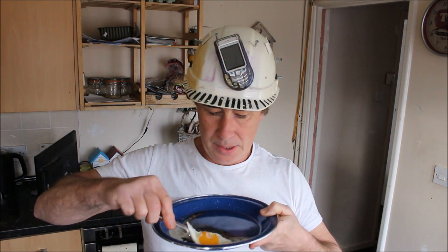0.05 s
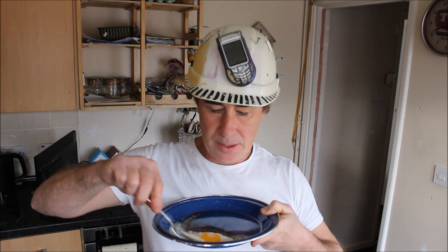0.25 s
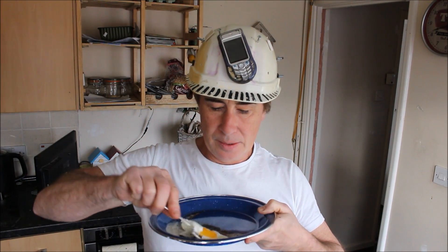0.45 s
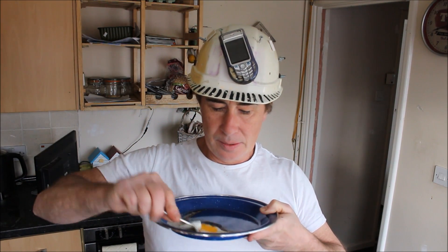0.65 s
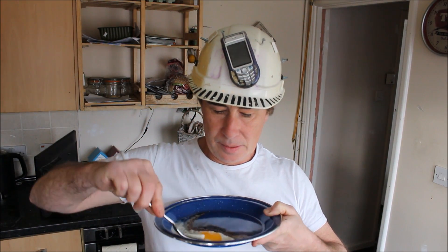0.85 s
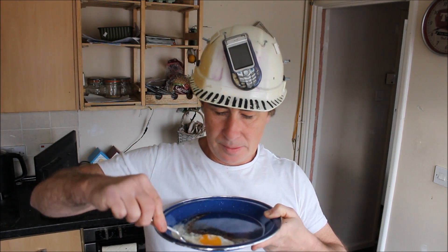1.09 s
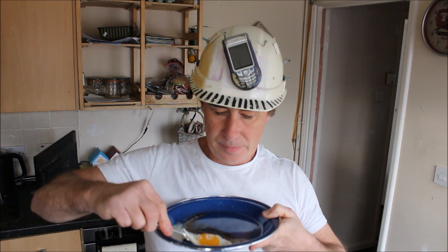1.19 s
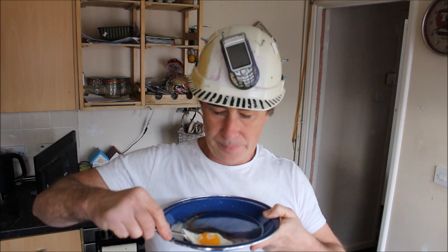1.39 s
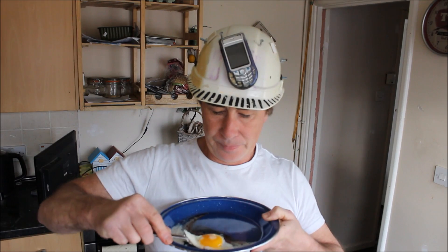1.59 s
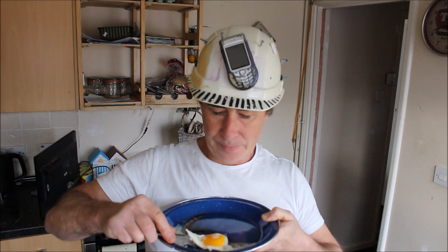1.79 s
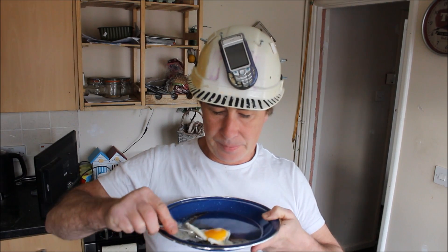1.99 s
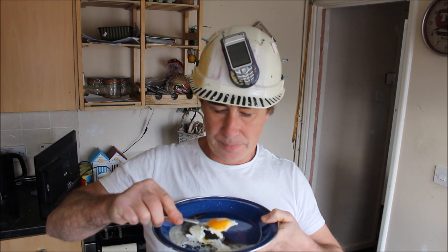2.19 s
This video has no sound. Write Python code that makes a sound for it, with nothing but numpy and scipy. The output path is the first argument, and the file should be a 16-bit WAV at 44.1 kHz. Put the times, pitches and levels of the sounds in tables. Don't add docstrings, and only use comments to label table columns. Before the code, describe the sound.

A steel fork strikes a plate with a loud bright clink, scrapes and slides briefly, taps once more, then cuts softly through egg; small hard kitchen, microphone about two metres away, faint low hum behind.

```python
import sys
import numpy as np
from scipy import signal
from scipy.fft import rfft, irfft
from scipy.io import wavfile
from scipy.ndimage import uniform_filter1d

SR = 44100
rng = np.random.default_rng(int(sys.argv[2]) if len(sys.argv) > 2 else 0)


def dump_mix(stems):
    frames = np.atleast_2d(stems).T
    limited = np.clip(frames, -1, 1)
    pcm = np.round(limited * 32767).astype(np.int16)
    wavfile.write(sys.argv[1], SR, pcm)


def volts(x):
    e = np.asarray(x, float) / 20
    return 10 ** e


N = 99225

# (frequency [Hz], width [Hz], level [dB])
MIDDLE_MODES = [(785, 26.6, -37.5), (990, 24, -15.5), (1520, 81, -3), (1780, 97, 9.5), (2315, 130, -6),
                (2575, 160, 9), (3230, 140, 5.5), (3620, 150, 4.5), (4380, 160, -2), (4540, 92, -5)]


def evened(x):
    return x / np.sqrt(np.mean(x ** 2) + 1e-20)


def read(points, hz):
    f, value = np.transpose(points)
    return np.interp(np.log(hz + 1), np.log(f + 1), value)


def resonate(x, hz, width):
    turn = np.exp(2j * np.pi * np.cumsum(hz * np.ones(len(x))) / SR)
    r = np.exp(-np.pi * width / SR)
    return 2 * (turn * signal.lfilter([1 - r], [1, -r], x / turn)).real


def tone(hz, level):
    return np.sqrt(2) * level * np.sin(2 * np.pi * np.cumsum(hz) / SR)


def causal(points, tilt_db=0):
    hz = abs(np.fft.fftfreq(1024, 1 / SR))
    flat = volts(read(points, hz))
    log = np.log(flat * volts(tilt_db * np.log2((hz + 100) / 2500)))
    impulse = np.fft.ifft(np.exp(np.conj(signal.hilbert(log)))).real[:512]
    return impulse / np.sqrt(np.mean(flat ** 2))


def air():
    # (frequency [Hz], level [dB])
    noise_spectrum = [(25, 0), (100, -3), (200, -4), (430, -7), (1330, -10.5), (5730, -17.5), (13600, -26),
                      (16000, -35)]
    # (frequency [Hz], correlation [0-1])
    coherence = [(60, 0.27), (400, 0.067), (2400, 0.11), (15000, 0.0091)]
    level_db, patchy_db = -55.5, 1.2
    frames, hz = N // 256 + 5, np.fft.rfftfreq(1024, 1 / SR)
    a, b, c, d, patches = rng.standard_normal((frames, 513, 5)).T
    patches = evened(uniform_filter1d(uniform_filter1d(patches, 12, 0), 10, 1))
    same = read(coherence, hz)[:, None]
    left = a + 1j * b
    right = same * left + np.sqrt(1 - same ** 2) * (c + 1j * d)
    z = np.array([left, right]) * volts(read(noise_spectrum, hz)[:, None] + patchy_db * patches)
    return volts(level_db) * evened(signal.istft(z, nperseg=1024, noverlap=768)[1][:, :N])


def traffic():
    # (time [s], frequency [Hz], level [dB])
    rumble = [
        (0, 62.6, -64),
        (0.6, 65, -58.5),
        (1.2, 64, -63),
        (1.6, 60.24, -67.5),
        (2.25, 55, -69),
    ]
    width_hz = 6
    t, (s, hz, db) = np.arange(N) / SR, np.transpose(rumble)
    f = np.interp(t, s, hz)
    noise = resonate(resonate(rng.standard_normal(N), f, width_hz), f, 3 * width_hz)
    return volts(np.interp(t, s, db)) * evened(noise)


def passing():
    # (time [s], frequency [Hz], level [dB])
    engine = [
        (1.55, 68.4, -75),
        (1.68, 60.6, -59),
        (1.82, 54.7, -55),
        (1.96, 49.2, -52),
        (2.1, 44.5, -48.5),
        (2.18, 43, -53.5),
        (2.25, 41.8, -65.5),
    ]
    t, (s, hz, db) = np.arange(N) / SR, np.transpose(engine)
    return tone(np.interp(t, s, hz), volts(np.interp(t, s, db, -120)))


def fridge():
    # (time [s], frequency [Hz], level [dB])
    hum_path = [(0, 124, -54), (0.2, 135.5, -48.5), (0.27, 132.7, -60.5), (0.4, 136.4, -44.5),
                (0.49, 134, -41.5), (0.65, 132.5, -51.5), (0.86, 132.9, -45.5), (1.02, 130, -59.5),
                (1.13, 133.8, -49), (1.3, 130.7, -64.5), (1.501, 131.8, -50.5), (1.7, 130.6, -56),
                (1.9, 129.9, -52.5), (2.101, 129, -59), (2.25, 128, -55)]
    t, (s, hz, db) = np.arange(N) / SR, np.transpose(hum_path)
    return tone(np.interp(t, s, hz), volts(np.interp(t, s, db)))


def motor():
    # (time [s], level [dB])
    ticks = [
        (1.853, -52),
        (1.933, -51),
        (2.016, -51),
        (2.101, -53),
        (2.226, -51.5),
    ]
    out = np.zeros(N)
    for s, db in ticks:
        u = np.maximum(np.arange(N) / SR - s, 0)
        out += volts(db) * u / 0.003 * np.exp(1 - u / 0.0024) * np.sin(2 * np.pi * 710.6 * u)
    return out


def rub():
    # (time [s], level [dB])
    rubbing = [(0, -57), (0.15, -58), (0.19, -45), (0.36, -40.5), (0.501, -49.5), (0.62, -60.5),
               (0.67, -49.5), (0.86, -51.5), (0.98, -45.5), (1.1, -63), (1.3, -69.5), (1.38, -63.5),
               (1.55, -58.5), (1.8, -70.5), (2.1, -73), (2.15, -58), (2.25, -77.5)]
    # (frequency [Hz], width [Hz], level [dB])
    low_modes = [(361.6, 22.6, 2.1), (415.6, 22.3, 0.88)]
    # (start [s], length [s], frequency [Hz], width [Hz], level [dB])
    squeak = (0.07, 0.09, 5525, 12, -59)
    t, (s, db) = np.arange(N) / SR, np.transpose(rubbing)
    low = evened(sum(volts(d) * resonate(rng.standard_normal(N), hz, w) for hz, w, d in low_modes))
    start, length, hz, w, squeak_db = squeak
    arch = np.sin(np.pi * np.clip((t - start) / length, 0, 1)) ** .5
    thin = evened(resonate(rng.standard_normal(N), hz, w))
    return low * volts(np.interp(t, s, db)) + volts(squeak_db) * arch * thin


def ring(modes, tilt_db, crack_db):
    # (frequency [Hz], level [dB])
    crack_spectrum = [(200, -23), (750, -15.5), (1400, 1.5), (2800, 11), (4500, 3), (7000, -8),
                      (11000, -18), (16000, -28)]
    t, body = np.arange(6000) / SR, 0
    for hz, w, db in modes:
        gain = volts(db + tilt_db * np.log2(hz / 2500))
        body = body + gain * w * np.exp(-np.pi * w * t) * np.sin(2 * np.pi * hz * t)
    body /= np.sqrt(sum(volts(2 * db) * w for hz, w, db in modes) * SR / (4 * np.pi))
    body[:512] += volts(crack_db) * causal(crack_spectrum, tilt_db)
    return body


def chatter(z, ms):
    t = np.arange(len(z)) / SR * 1000
    shape = np.minimum(t / 0.288, 1) * np.exp(-t / ms)
    for _ in range(8):
        envelope = np.sqrt(abs(uniform_filter1d(z ** 2, 40)) + 1e-12)
        spectrum = rfft(z / envelope * shape)
        z = irfft(spectrum / abs(spectrum))
    return z * shape ** .5


def burst(z, ms, response, order, top_hz):
    sound = np.convolve(chatter(z, ms), response)
    sound = signal.lfilter(*signal.butter(order, top_hz, fs=SR), sound)
    return sound / abs(sound).max()


def hits(table, modes, crack_db=-0.5):
    out = np.zeros(N + 9000)
    for (s, db, tilt_db, ms, top_hz), z in zip(table, rng.standard_normal((len(table), 1500))):
        sound = burst(z, ms, ring(modes, tilt_db, crack_db), 4, top_hz)
        out[round(s * SR):][:len(sound)] += volts(db) * sound
    return out[:N]


def stroke(curve, modes):
    grains_per_s, spread_db, grit_db = 2500, 2, -0.5
    s, db, tilt_db = np.transpose(curve)
    t = np.arange(N) / SR
    sizes = volts(spread_db * np.minimum(rng.exponential(1, N), 2.6))
    slips = sizes * (rng.random(N) < grains_per_s / SR) * rng.choice([-1, 1], N)
    force = evened(slips) * volts(np.interp(t, s, db, -120, -120))
    bright = np.clip(np.interp(t, s, tilt_db) / 8 + .5, 0, 1)
    out = 0
    for part, end_db in ((1 - bright, -4), (bright, 4)):
        out = out + signal.oaconvolve(force * part, ring(modes, end_db, grit_db))[:N]
    return out


def thuds():
    # (frequency [Hz], width [Hz], level [dB])
    thud_modes = [(445, 120, 2.5), (690, 230, 4), (934, 230, -1), (2250, 500, -23)]
    # (time [s], peak [dB], tilt [dB/octave], contact [ms], treble edge [Hz])
    thud_blows = [
        (0.166, -33, 0, 5.3, 3000),
        (0.229, -23, 0, 5.7, 2490),
        (0.647, -34.5, 0.0072, 4, 1800),
    ]
    return hits(thud_blows, thud_modes)


def food():
    # (frequency [Hz], width [Hz], level [dB])
    food_modes = [(415, 49, 0.5), (770, 50, -30), (1042, 53, -26), (1404, 40, -15), (1646, 150, 1.5),
                  (1957, 210, 6.5), (2150, 390, 3), (2426, 130, 3), (3160, 81, -29), (4670, 110, -36)]
    # (time [s], peak [dB], tilt [dB/octave], contact [ms], treble edge [Hz])
    food_blows = [
        (1.5955, -16, -1.2, 5.8, 4800),
        (1.605, -21.5, -1.8, 4.8, 3460),
    ]
    # (time [s], pressure [dB], tilt [dB/octave])
    cutting = [
        (1.38, -67, -5),
        (1.43, -66.5, -2),
        (1.45, -58.5, 1),
        (1.5, -67, -2),
        (1.55, -78, 10),
        (1.59, -79, 1),
    ]
    return hits(food_blows, food_modes, -7) + stroke(cutting, MIDDLE_MODES)


def scrapes():
    # (frequency [Hz], width [Hz], level [dB])
    drag_modes = [(436, 30, 1), (1586, 220, 2.5), (2190, 90, 1.5), (2420, 93, 2), (3037, 150, -8.5),
                  (3920, 150, -8), (4150, 160, -8), (5430, 300, -15)]
    slide_modes = [(812, 12, -30), (1800, 143, -4), (2340, 69, -12), (2560, 60, 3), (2766, 80, 2.5),
                   (3296, 140, -1.5), (3810, 90, -4.5), (4780, 395, -15.5)]
    # (time [s], pressure [dB], tilt [dB/octave])
    drag_path = [(0.06, -61, 5), (0.1, -63.5, 0.5), (0.2, -56, 0), (0.245, -42.5, -6.5), (0.27, -43, 3),
                 (0.3, -38.5, 2.5), (0.335, -35.5, 2), (0.35, -28, 2.5), (0.38, -36, 2), (0.43, -48, -1.5),
                 (0.6, -53.5, 3.5), (0.7, -78, 26)]
    slide_path = [(0.737, -35, -4.5), (0.76, -36, 1.5), (0.785, -37.5, 5), (0.8, -34.5, 1.5),
                  (0.83, -36, 1), (0.855, -43, 4.5), (0.868, -35, 3), (0.9, -53.5, -2), (0.915, -39.5, -10),
                  (0.95, -49, -1.4), (1.02, -60.5, 3)]
    return stroke(drag_path, drag_modes) + stroke(slide_path, slide_modes)


def snaps():
    # (time [s], peak [dB], length [ms], treble edge [Hz])
    tine_snaps = [(0.165, -44, 3.5, 11900), (0.2485, -17.5, 5.4, 16100), (0.344, -26.5, 4.3, 16000),
                  (0.607, -49, 4, 14000), (0.649, -44.5, 3.8, 14100), (0.741, -31, 4, 15000),
                  (0.864, -48, 1.7, 15000), (0.911, -47, 3, 8950), (0.926, -51, 1.004, 9000),
                  (1.0327, -24, 3.2, 14100), (1.272, -49, 9.1, 16000), (1.599, -36.5, 6, 9800)]
    # (frequency [Hz], level [dB])
    snap_spectrum = [(1500, -39.5), (4000, -26), (7000, 2.5), (10000, 1), (14000, -9), (16500, -22.5)]
    out, response = np.zeros(N + 9000), causal(snap_spectrum)
    for (s, db, ms, top_hz), z in zip(tine_snaps, rng.standard_normal((len(tine_snaps), 1500))):
        sound = burst(z, ms, response, 3, top_hz)
        out[round(s * SR):][:len(sound)] += volts(db) * sound
    return out[:N]


def catches():
    # (time [s], peak [dB], frequency [Hz], width [Hz])
    caught_modes = [(0.344, -16.5, 3843, 57), (0.739, -27, 3750, 83), (0.762, -28, 2305, 40),
                    (0.791, -22, 1778, 38), (0.792, -23.5, 2560, 46), (0.81, -26.5, 3297, 62),
                    (0.817, -29, 1800, 30), (0.862, -30.5, 1800, 32), (0.908, -24.5, 3810, 50),
                    (0.29, -21, 2404, 25), (0.292, -24.5, 2179, 20), (0.272, -25.5, 3700, 87),
                    (0.2467, -10, 1615, 70), (0.2461, -14.5, 1345, 45), (0.2468, -20, 914, 51),
                    (0.247, -13, 3745, 45), (0.247, -15.5, 3045, 50), (0.246, -30, 190, 55),
                    (1.032, -20.5, 2575, 35), (1.032, -24, 1780, 87), (1.597, -42.5, 415, 7.2)]
    rise_s, out = 0.0013, np.zeros(N)
    for s, db, hz, width in caught_modes:
        u = np.maximum(np.arange(N) / SR - s, 0)
        swell = (1 - np.exp(-u / rise_s)) * np.exp(-np.pi * width * u)
        out += volts(db) * swell * np.sin(2 * np.pi * hz * u)
    return out


def taps():
    # (frequency [Hz], width [Hz], level [dB])
    rim_modes = [(430, 260, -18), (1000, 23, -16), (1345, 47, -3.5), (1573, 164, 0), (2270, 59, -1.5),
                 (2450, 110, 7), (3093, 220, 0.5), (3745, 137, 6), (4200, 170, -4), (4840, 260, -2),
                 (5980, 270, -9), (7460, 260, -3.5)]
    # (time [s], peak [dB], tilt [dB/octave], contact [ms], treble edge [Hz])
    rim_blows = [
        (0.2465, -0.5, -1.5, 3.1, 7400),
        (0.3445, -13, -2.5, 6.1, 9000),
        (0.739, -17.5, 1, 2.9, 7200),
    ]
    middle_blows = [
        (1.031, -8.5, 0.28, 4.6, 5950),
        (1, -26, 0.65, 2.6, 7800),
        (1.439, -25, -1.6, 6.8, 4600),
    ]
    return hits(rim_blows, rim_modes) + hits(middle_blows, MIDDLE_MODES)


def kitchen(x):
    # (frequency [Hz], t60 [s])
    decay = [(200, 0.12), (1000, .34), (2500, 0.37), (6000, 0.36), (10000, 0.24), (15000, 0.12)]
    # (frequency [Hz], share [0-1])
    shared_tail = [(300, 0.27), (2500, 0.76), (9000, 0.088)]
    # (delay [s], left [dB], right [dB])
    echoes = [
        (.0014, -13, -22),
        (.0045, -19, -10),
        (.008, -7.5, -22.5),
        (.013, -18.5, -6),
    ]
    tail_db, ports_db = -2, -7
    pulses = np.zeros((3, SR // 2))
    at = np.arange(200, SR // 2 - 10, 10) + rng.integers(0, 10, (3, (SR // 2 - 201) // 10))
    np.put_along_axis(pulses, at, rng.choice([-1., 1.], at.shape), 1)
    hz, t, z = signal.stft(pulses, SR, nperseg=256)
    same = read(shared_tail, hz)[:, None]
    z = np.sqrt(same) * z[2] + np.sqrt(1 - same) * z[:2]
    tail = signal.istft(z * volts(-60 * t / read(decay, hz)[:, None]), SR, nperseg=256)[1]
    tail *= volts(tail_db) / np.linalg.norm(tail[0])
    tail[:, 1] += 1
    tail[:, :3] += volts(ports_db) * np.outer([1, -1], [1, 0, -1])
    for k, (s, left_db, right_db) in enumerate(echoes):
        tail[0, round(s * SR)] += volts(left_db)
        tail[1, round(s * SR) + 3 * k] += volts(right_db)
    return signal.fftconvolve(x[None], tail, axes=1)[:, :N]


def scene():
    background = air() + traffic() + passing() + fridge() + motor() + rub()
    caught = catches()
    plate = thuds() + food() + scrapes() + snaps() + volts(-7) * caught + taps()
    radiates = signal.butter(3, 383, "high", fs=SR, output="sos")
    plate = signal.sosfilt(radiates, plate)
    balance_db = [[-1], [1]]
    return (background + caught + kitchen(plate)) * volts(balance_db)


def low_pass(x):
    return signal.sosfilt(signal.butter(12, 16440, fs=SR, output="sos"), x)


def record(dry):
    overload, edge_hz = .86, 16300
    edge = signal.firwin(255, edge_hz, window=("kaiser", 9), fs=SR)[None]
    finished = signal.oaconvolve(np.clip(dry, -overload, overload), edge, "same")
    return low_pass(finished)


dry = scene()
out = record(dry)
dump_mix(out)
```